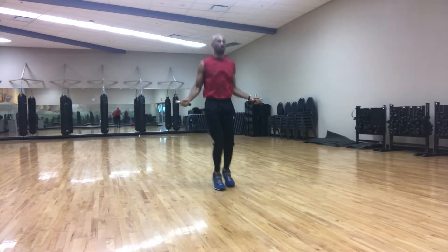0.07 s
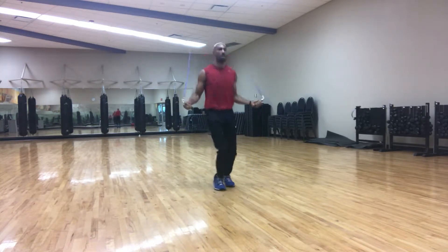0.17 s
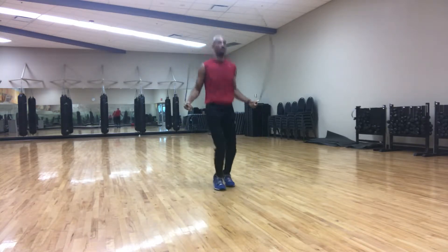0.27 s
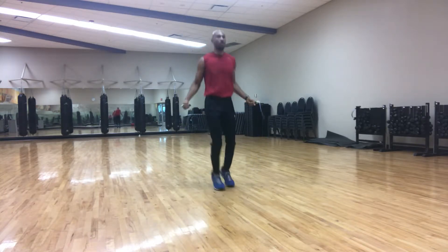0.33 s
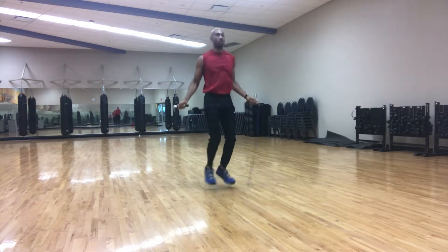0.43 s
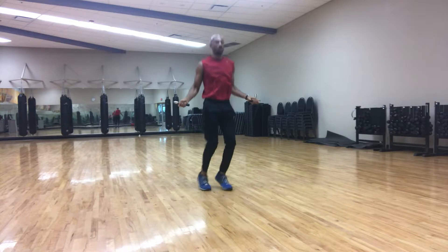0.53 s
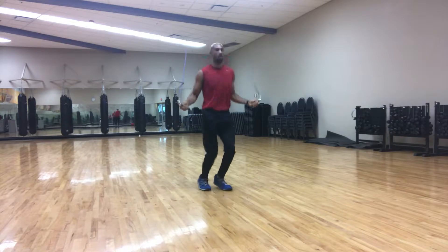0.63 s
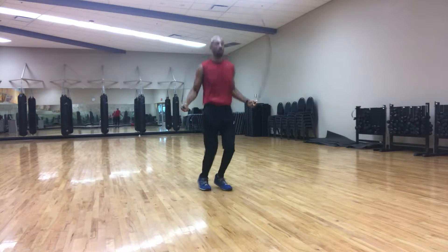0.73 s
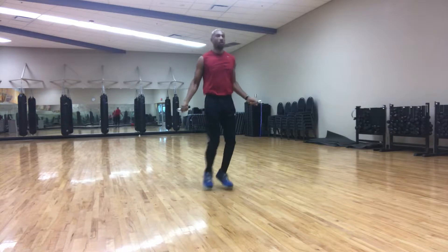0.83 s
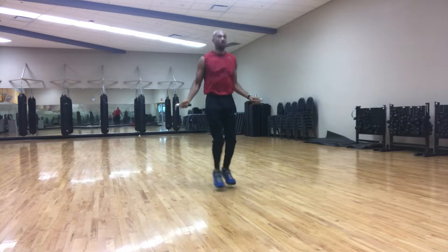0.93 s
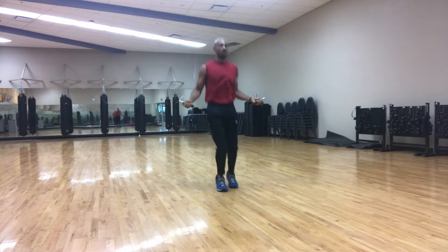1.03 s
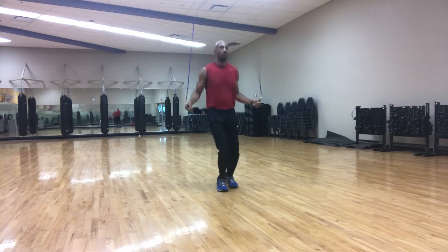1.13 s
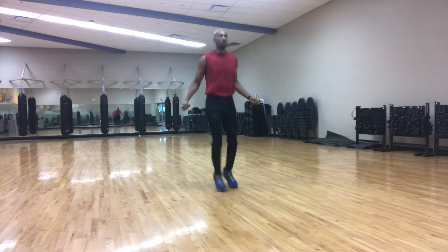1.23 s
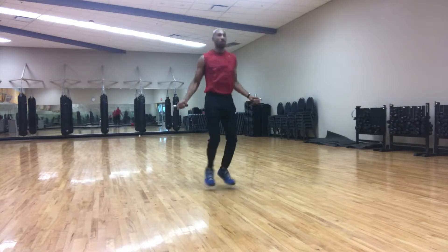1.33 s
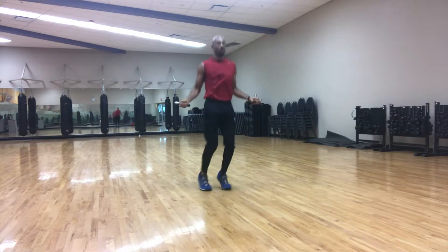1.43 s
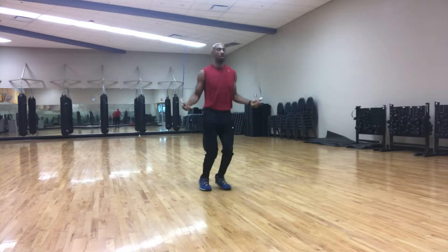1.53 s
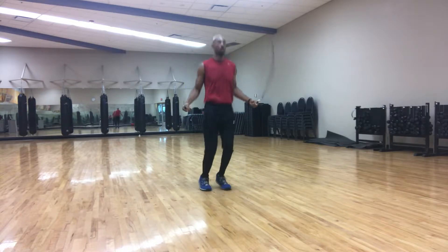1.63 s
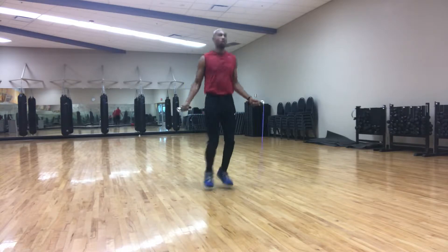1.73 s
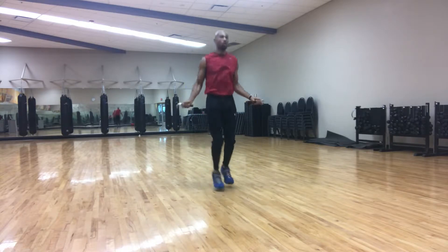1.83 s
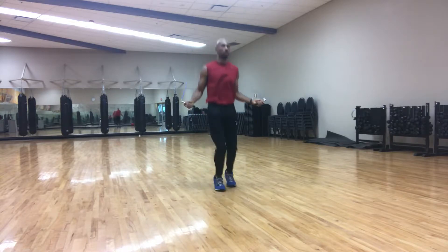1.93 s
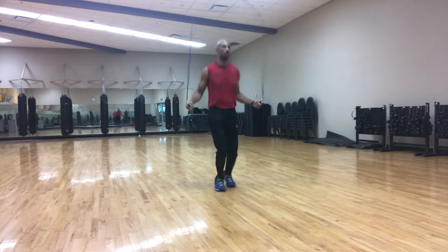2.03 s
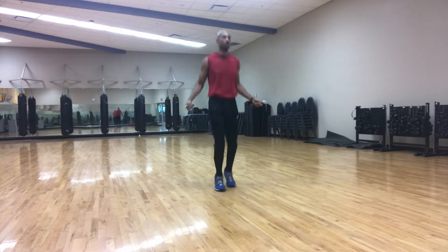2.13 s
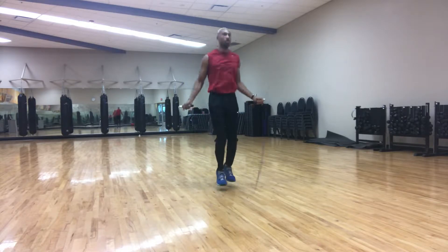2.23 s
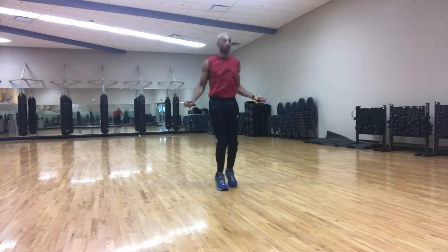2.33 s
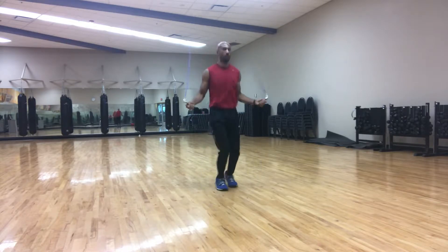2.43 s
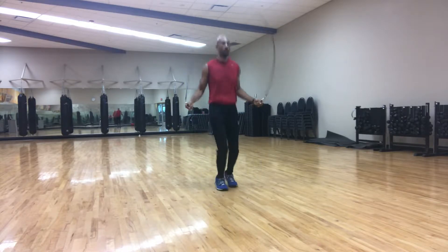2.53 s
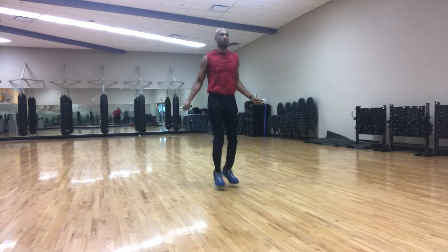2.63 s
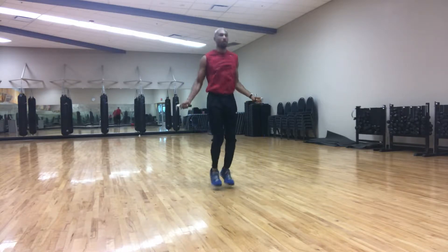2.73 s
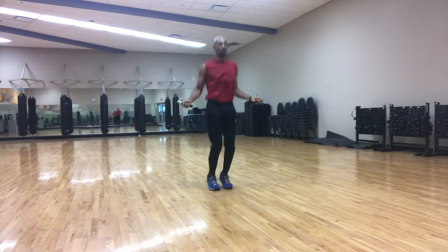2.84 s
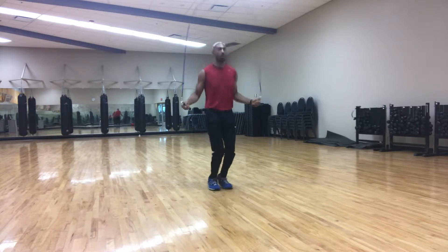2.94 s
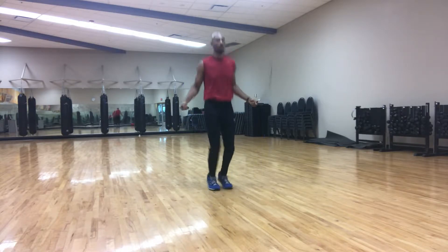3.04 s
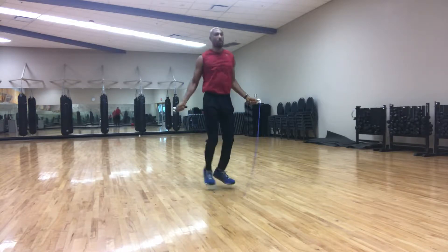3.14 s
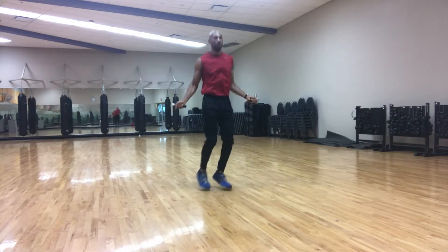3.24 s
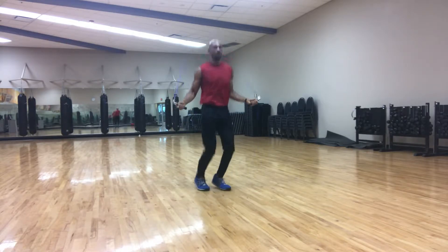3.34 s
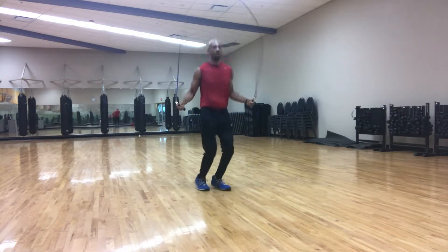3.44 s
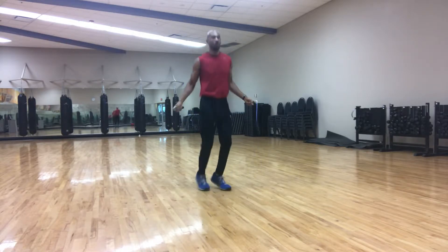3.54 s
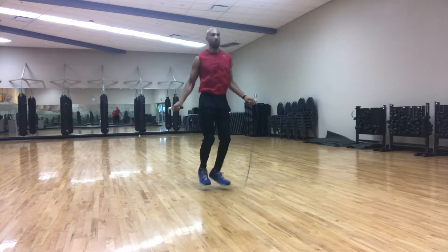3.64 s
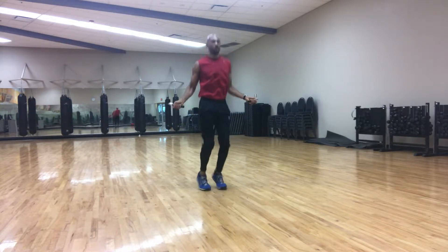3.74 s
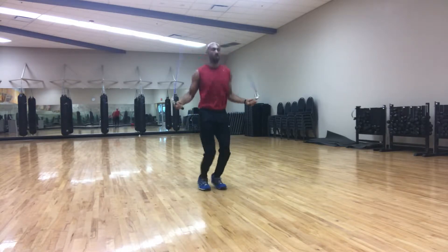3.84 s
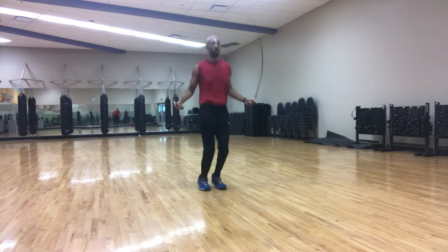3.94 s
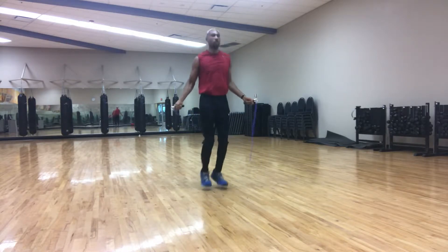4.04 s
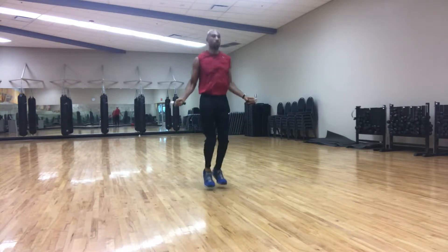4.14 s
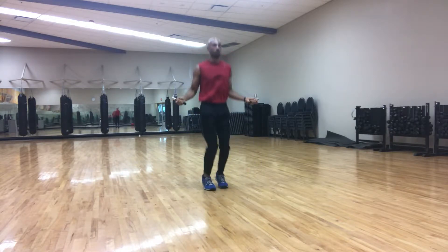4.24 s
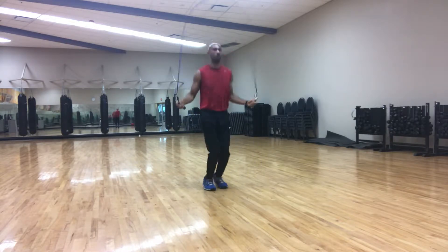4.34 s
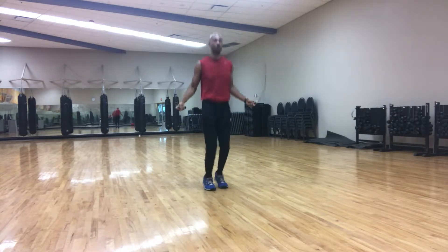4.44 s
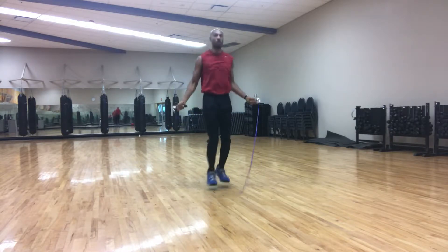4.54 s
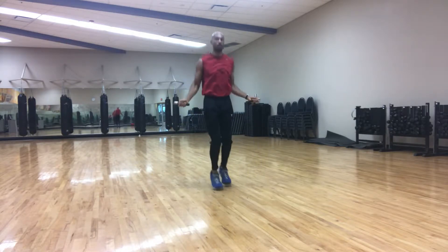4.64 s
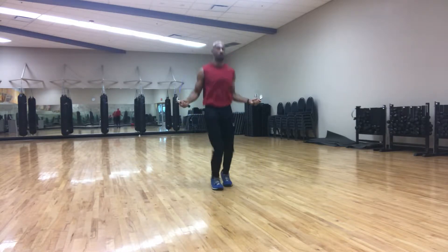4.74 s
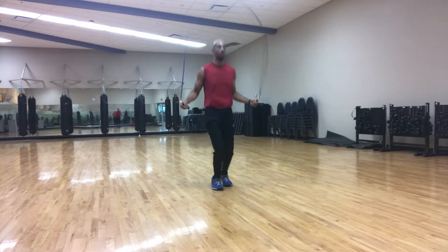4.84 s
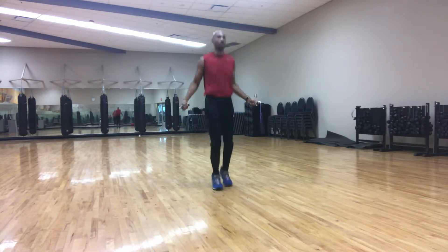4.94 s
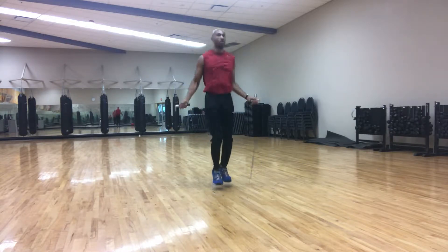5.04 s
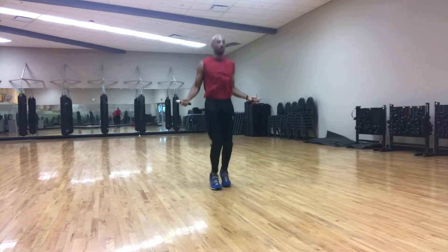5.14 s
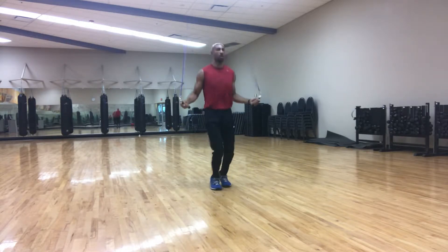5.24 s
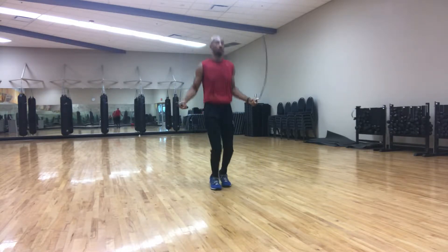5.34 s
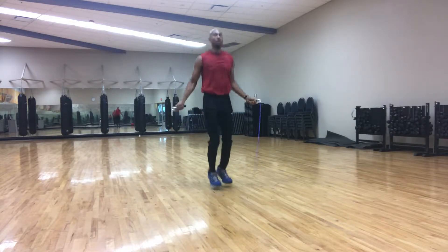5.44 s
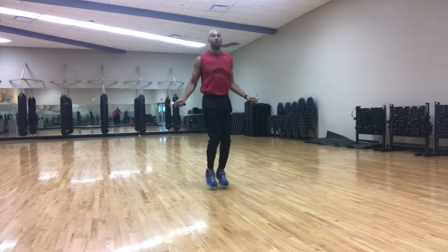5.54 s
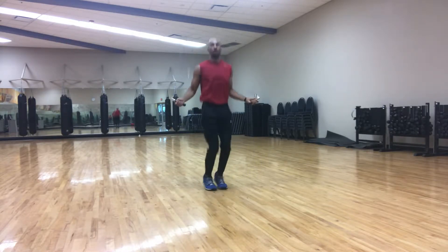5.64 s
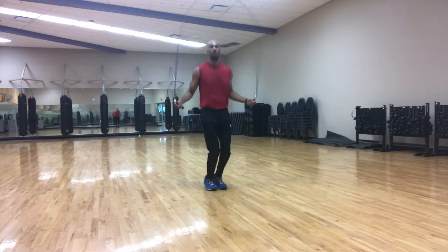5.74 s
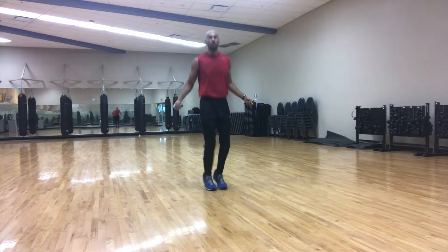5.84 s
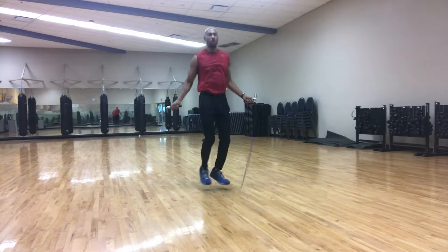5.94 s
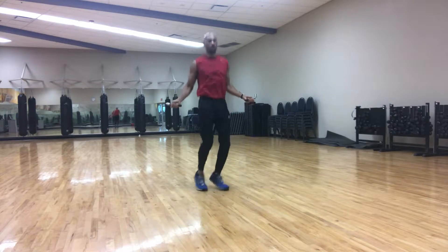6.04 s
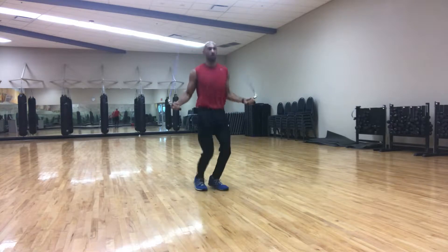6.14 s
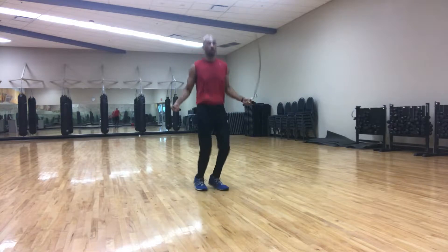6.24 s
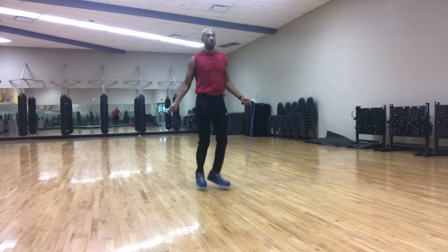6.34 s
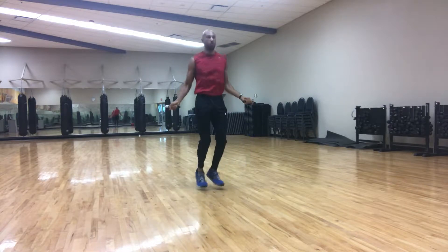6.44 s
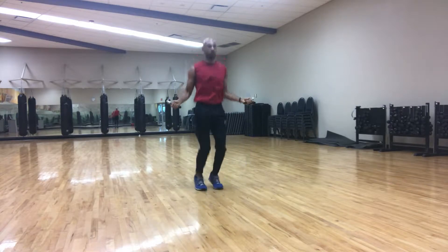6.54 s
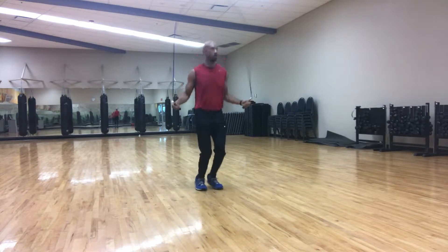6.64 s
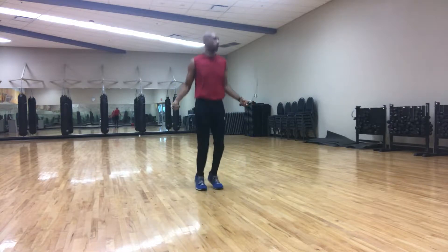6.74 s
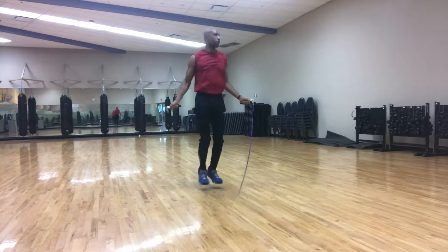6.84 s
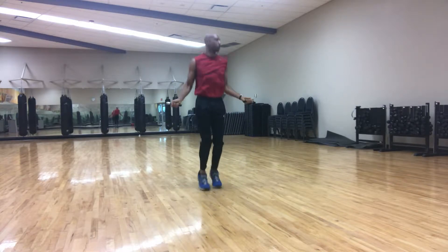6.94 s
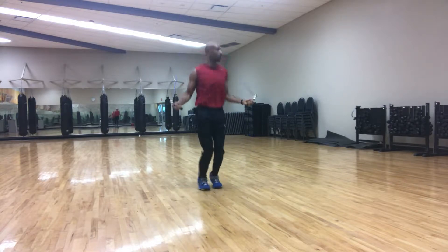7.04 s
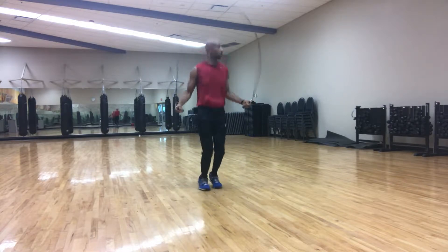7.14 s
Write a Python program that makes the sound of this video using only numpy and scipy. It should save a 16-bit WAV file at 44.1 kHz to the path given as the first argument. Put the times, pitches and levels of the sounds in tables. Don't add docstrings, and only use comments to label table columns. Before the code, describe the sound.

A heavy skipping rope cracks sharply on a wooden floor about twice a second, shoes tapping down between slaps in a big echoing gym.

```python
import sys
import numpy as np
from scipy import signal
from scipy.fft import rfft, irfft
from scipy.io import wavfile
from scipy.ndimage import uniform_filter1d

SR = 44100
rng = np.random.default_rng(int(sys.argv[2]) if len(sys.argv) > 2 else 0)


def gain_from_db(level_db):
    decades = np.asarray(level_db, float) / 20
    return 10 ** decades


def pcm_store(signal):
    levels = np.round(np.clip(np.atleast_2d(signal), -1, 1) * 32767)
    wavfile.write(sys.argv[1], SR, levels.astype(np.int16).T)


N = 316622

# (time [s], crack peak [dB], knock pitch [Hz], knock level [dB], ceiling echo [dB])
SLAPS = [(0.0172, -11, 1330, -27.5, -2), (0.4766, -9, 1413, -17, 1.5), (0.9401, -7.5, 1260, -21, -2),
         (1.4024, -11, 1230, -24, 0), (1.8518, -9.5, 1360, -17, 2), (2.3171, -10.5, 1270, -17.5, 3),
         (2.7751, -10, 1190, -23, 1), (3.2346, -10, 1220, -27.5, -2), (3.7048, -12.5, 1220, -24, 4.5),
         (4.1777, -12, 1510, -25.5, -0.5), (4.6373, -10, 1630, -28.5, -2), (5.0989, -9.5, 990, -23, -0.5),
         (5.5689, -12, 1000, -33, 2), (6.0145, -10.5, 1270, -26.5, 1), (6.4709, -9.5, 1240, -20, 0),
         (6.9299, -10.5, 1230, -21, 0)]


def evened(x):
    return x / np.sqrt(np.mean(x ** 2) + 1e-20)


def read(points, hz):
    f, value = np.transpose(points)
    return np.interp(np.log(hz + 1), np.log(f + 1), value)


def add(mix, s, sound):
    start = round(s * SR)
    part = mix[max(start, 0):][:len(sound) + min(start, 0)]
    part += sound[max(-start, 0):][:len(part)]


def coloured(x, points):
    hz = np.fft.rfftfreq(len(x), 1 / SR)
    return irfft(rfft(x) * gain_from_db(read(points, hz)), len(x))


def burst(t, hz, ms):
    return np.cos(2 * np.pi * hz * t) * np.exp(-.5 * (t * 1000 / ms) ** 2)


def resonate(x, hz, width):
    turn = np.exp(2j * np.pi * np.cumsum(np.broadcast_to(hz, len(x))) / SR)
    r = np.exp(-np.pi * width / SR)
    return 2 * (turn * signal.lfilter([1 - r], [1, -r], x / turn)).real


def hall(x, colour, start_ms, rise_ms):
    # (frequency [Hz], decay by 60 dB [s])
    hall_t60 = [(60, 0.33), (200, 0.79), (600, 0.94), (1500, 0.9), (3500, 1.245), (6500, 0.81),
                (10000, 0.68), (16000, 0.74)]
    size = SR + SR // 2
    slots = np.arange(0, size - 16, 16)
    at = slots + rng.integers(0, 16, len(slots))
    taps = np.zeros(size)
    taps[at] = rng.choice([-1., 1.], len(at))
    hz, t, z = signal.stft(taps, SR, nperseg=512)
    clumps = uniform_filter1d(rng.standard_normal(z.shape), size=9, axis=0)
    clumps = 2.5 * evened(uniform_filter1d(clumps, size=2, axis=1))
    decay = 60 * t / np.maximum(read(hall_t60, hz), .1)[:, None]
    tail = signal.istft(z * gain_from_db(clumps + read(colour, hz)[:, None] - decay), SR, nperseg=512)[1]
    tail *= np.clip((np.arange(len(tail)) / SR * 1000 - start_ms) / rise_ms, 0, 1)
    return signal.fftconvolve(x, tail / np.sqrt(size / 160))[:N]


def ventilation():
    # (frequency [Hz], density [dB per Hz])
    duct_colour = [(20, -56), (40, 2), (60, -3), (90, -8.5), (130, -10.5), (200, -16), (270, -11),
                   (500, -22), (1000, -26), (2500, -35), (2900, -32), (4300, -36.5), (4800, -39),
                   (9000, -50), (16000, -46)]
    return gain_from_db(-48) * evened(coloured(rng.standard_normal(N), duct_colour))


def rope_hum():
    # (share of the turn, pitch [Hz], level [dB])
    sweep = [(0, 412, 7.5), (.08, 421, -11.5), (.22, 383.5, 6.5), (.33, 382.4, -3.7), (.5, 401, 0),
             (.7, 357, -4.5), (.8, 388, 0), (.88, 423.5, -1.5), (1, 432, 2.5)]
    s = np.transpose(SLAPS)[0]
    s = np.concatenate([[2 * s[0] - s[1]], s, [2 * s[-1] - s[-2]]])
    turn = np.interp(np.arange(N) / SR, s, np.arange(len(s))) % 1
    share, hz, db = np.transpose(sweep)
    pitch = np.interp(turn, share, hz)
    tone = rng.standard_normal(N)
    for width in (45, 110, 160):
        tone = resonate(tone, pitch, width)
    return gain_from_db(-48.5 + np.interp(turn, share, db)) * evened(tone)


def handle_chirps():
    # (time [s], peak [dB], pitch [Hz])
    chirps = [
        (2.305, -48, 2320),
        (4.6205, -40, 2390),
        (5.529, -59, 2270),
        (6.4575, -39, 2250),
    ]
    out, t = np.zeros(N), np.arange(400) / SR
    for s, db, hz in chirps:
        add(out, s, gain_from_db(db - 1.0) * burst(t - .003, hz, 1.9))
    return out


def handle_ticks():
    # (delay after the slap [ms], tick peak [dB], low rattle [dB])
    jolts = [(115, -29, -32.5), (127, -29.5, -32), (121, -30.5, -31), (116, -34, -32), (120, -30, -25),
             (114.3, -34.5, -36), (118.7, -33.5, -30), (122, -32.5, -31.5), (115.5, -33.5, -30),
             (117, -34.5, -35), (114, -33, -35), (118.5, -32, -33.5), (111, -35, -34), (117, -31, -31.5),
             (116, -30.5, -29), (117, -31.5, -32)]
    # (pitch [Hz], level [dB])
    swivels = [(2250, -4), (4400, -7)]
    out, t = np.zeros(N), np.arange(6000) / SR
    for (s, *_), (ms, tick_db, rattle_db) in zip(SLAPS, jolts):
        envelope = gain_from_db(-60 * t / 0.0087) + 1.07 * burst(t - .0022, 0, 0.66)
        shake = rng.standard_normal(len(t)) * np.minimum(t / 0.00032, 1) * envelope
        tick = resonate(resonate(shake, 11600, 4000), 11600, 4000)
        rattle = resonate(resonate(shake, 3800, 3500), 3800, 3500)
        clink = np.zeros(len(t))
        for hz, db in swivels:
            louder, sharper = rng.standard_normal(2)
            clink += gain_from_db(db + 1.8 * louder) * burst(t - .0013, hz * (1 + 0.029 * sharper), 1.26)
        add(out, s + ms / 1000, gain_from_db(tick_db + 5) * tick + gain_from_db(rattle_db) * (rattle + clink))
    return out


def footfalls():
    # (time [s], tap peak [dB], tap pitch [Hz], thud level [dB])
    first_shoe = [(0.12, -34.5, 1060, -44), (0.572, -37, 969, -60), (1.042, -29.5, 910, -32.5),
                  (1.498, -31.5, 980, -36), (1.96, -29, 920, -62), (2.422, -26, 1240, -41),
                  (2.881, -30.5, 900, -36), (3.333, -43, 877, -65), (3.807, -29.5, 1120, -29.5),
                  (4.277, -31, 1110, -34), (4.753, -30.5, 960, -33.5), (5.212, -29.5, 810, -35),
                  (5.674, -30.5, 850, -37), (6.115, -42, 840, -51), (6.57, -28.5, 1730, -28),
                  (7.043, -27.5, 940, -38)]
    # (delay after the first [ms], tap peak [dB], thud level [dB])
    second_shoe = [(15.96, -36, -31), (19.5, -27.5, -34.5), (15.16, -32.5, -27.5), (21.6, -35, -39.5),
                   (9.02, -33.5, -27.5), (12.03, -40, -28), (11.07, -40, -35.5), (20.2, -29, -34),
                   (14.04, -36, -35.5), (17.9, -34.5, -35.5), (10.7, -36.5, -26), (13.04, -39.5, -35.5),
                   (10.97, -30, -33), (13.04, -30, -32), (14.9, -27.5, -41), (13.53, -46, -32.5)]
    # (pitch [Hz], level [dB], decay by 60 dB [s])
    boards = [(106, -39, 0.046), (136.7, 0.5, 0.13), (176, 8.5, 0.067), (207, -16, 0.053),
              (353.4, -1.5, 0.13), (596, -3.5, 0.034)]
    out, t = np.zeros(N), np.arange(6000) / SR
    second = [(row[0] + ms / 1000, tap_db, 980, thud_db)
              for row, (ms, tap_db, thud_db) in zip(first_shoe, second_shoe)]
    for s, tap_db, tap_hz, thud_db in sorted(first_shoe + second):
        tap = -gain_from_db(tap_db + 3.0) * burst(t - .0012, tap_hz, 0.55)
        scuff = gain_from_db(tap_db) * rng.standard_normal(len(t)) * gain_from_db(-60 * t / 0.054) * np.minimum(t / 0.001, 1)
        scuff = resonate(resonate(scuff, 900, 2070), 900, 2530)
        thud = np.zeros(len(t))
        for hz, db, t60 in boards:
            louder, sharper = rng.standard_normal(2)
            ring = np.sin(2 * np.pi * hz * (1 + 0.025 * sharper) * t)
            thud += gain_from_db(db + 1.75 * louder - 60 * t / t60) * ring
        add(out, s, tap + scuff + gain_from_db(thud_db - 6.0) * thud * np.minimum(t / 0.0045, 1))
    return out


def landings():
    # (frequency [Hz], level [dB])
    step_hall = [(60, -25), (150, 6.5), (400, 4.5), (1000, -4), (3500, 5.5), (8000, 11), (16000, 18)]
    steps = footfalls()
    near = steps + handle_ticks()
    ceiling = np.concatenate([np.zeros(round(.0146 * SR)), near])[:N]
    return near + gain_from_db(-11.5) * ceiling + gain_from_db(2.0) * hall(steps, step_hall, 1.8, 13.0)


def board_bend(t):
    since = np.maximum(t, 0)
    hz = 1200 * (0.004866 / (since + 0.004824)) ** 2 + 60
    chirp = np.sin(2 * np.pi * np.cumsum(hz * (t > 0)) / SR - 1.2)
    return gain_from_db(-30) * chirp * np.minimum(since / 0.0042, 1) * gain_from_db(-60 * (since / 0.044) ** 2)


def wall_echoes(hz, size, ceiling_db):
    # (level [dB], centre [Hz], width [Hz])
    reflections = [(-11.5, 2200, 5000), (-11, 13000, 9000), (1.5, 6200, 1680), (0, 18800, 8800),
                   (-5, 4700, 670), (0, 17400, 15000), (-7, 4300, 3200), (-23.5, 2800, 3400),
                   (-7.5, 4500, 2100), (0, 3380, 920), (-5.5, 4800, 1200), (-17, 5100, 9100),
                   (-15, 15000, 5400), (-11, 2900, 2200), (-12, 6000, 4800), (-14, 3900, 5600),
                   (-17.5, 1300, 7600), (-11.5, 4700, 500), (-12, 5500, 470), (-8, 3600, 1200),
                   (-19, 10000, 6000), (-15, 5300, 1600)]
    reflection_ms = [3.2, 5.4, 14.0, 14.0, 16.4, 19.0, 21.1, 23.4, 28.2, 31.6, 34.8, 36.4, 38.0, 41.2, 43.1,
                     55.3, 68.4, 79.0, 81.8, 83.2, 84.5, 90.6]
    db, centre_hz, width_hz = np.transpose(reflections)[:, :, None]
    ms = np.array(reflection_ms)[:, None]
    shift = rng.standard_normal((len(ms), 2))
    delay = np.exp(-2j * np.pi * hz * (ms + 0.066 * shift[:, :1]) / 1000)
    off = abs(ms - 15)
    spread = np.clip(off, 1, 14) ** 2 / (off + 4) / 9000 + np.maximum(ms - 22, 0) / 30000
    scatter = rng.standard_normal((len(ms), 400)) * np.exp(-np.arange(400) / SR / spread)
    scatter[:, 0] = abs(scatter[:, 0]) + .5
    scatter = rfft(scatter / np.linalg.norm(scatter, axis=1)[:, None], size)
    gain = gain_from_db(db + 1.4 + shift[:, 1:] + ceiling_db * (ms == 14))
    band = (1 + 1.3j * (hz - centre_hz) / width_hz) ** 2
    return (delay * scatter * gain / band).sum(0)


def slap(crack_db, knock_hz, knock_db, ceiling_db):
    # (frequency [Hz], level [dB])
    crack_colour = [(300, 2), (2000, 2), (3500, 0), (4800, -4.5), (6500, -0.5), (9000, -6), (12000, 3),
                    (15500, 5)]
    bass_ms = [14.3, 19.3, 21.7, 33.0]
    bass_db = [-7.5, -8, -42, -29]
    t = (np.arange(8192) - 512) / SR
    hz = np.fft.rfftfreq(len(t), 1 / SR)
    grit = rng.standard_normal(len(t))
    lay = gain_from_db(-29.5) * grit * np.clip((t + 0.0075) / 0.0018, 0, 1) * (t < 0) * gain_from_db(1400 * t)
    lay = coloured(lay, [(1500, -6.5), (4000, 6.5), (8000, -3), (11000, -2), (16000, -46)])
    rattle = gain_from_db(-23) * uniform_filter1d(grit, size=2) * (t > 0) * gain_from_db(-60 * np.abs(t) / 0.031)
    snap = (t == 0) - .7 * (np.arange(len(t)) == 515)
    tilt = gain_from_db(-2 * np.log2(hz / 6000 + 0.029))

    def voiced(x):
        return gain_from_db(crack_db + 8.5) * irfft(rfft(coloured(x, crack_colour)) * tilt, len(t))

    crack, plain = voiced(snap + lay + rattle), voiced(snap)
    knock = gain_from_db(knock_db) * burst(t + .0001, knock_hz, np.where(t < 0, .7, 1.1))
    knock += gain_from_db(knock_db - 8) * burst(t - .0006, 0.66 * knock_hz, 0.99)
    bend = board_bend(t)
    walls = wall_echoes(hz, len(t), ceiling_db)
    bass = sum(gain_from_db(db) * np.exp(-2j * np.pi * hz * ms / 1000) for ms, db in zip(bass_ms, bass_db))
    low = bend + gain_from_db(-7.5) * knock
    echoes = irfft(rfft(crack) * walls + rfft(low) * bass, len(t))
    return plain + gain_from_db(-15) * knock + bend, crack + knock + bend + echoes


def rope_slaps():
    # (frequency [Hz], level [dB])
    slap_hall = [(60, -46), (150, -6.5), (400, 1), (1000, 0.5), (2200, 0.5), (2900, 2.5), (4300, 5.5),
                 (4800, 0), (6300, 2), (10300, -2.5), (12000, 1), (16000, 6)]
    bare, near = np.zeros(N), np.zeros(N)
    for s, *row in SLAPS:
        bare_slap, near_slap = slap(*row)
        start = s + .0015 - 512 / SR
        add(bare, start, bare_slap)
        add(near, start, near_slap)
    return near + gain_from_db(1.5) * hall(bare, slap_hall, 4.3, 35.0)


def scene():
    return (ventilation() + rope_hum() + handle_chirps() + landings() + rope_slaps())[None]


def low_pass(x):
    return signal.sosfilt(signal.butter(12, 16810, fs=SR, output="sos"), x)


def record(dry):
    # (frequency [Hz], level [dB])
    microphone = [(20, -18.5), (70, 0), (120, -0.5), (9500, 1), (10300, -7), (11200, -6.5), (14500, -9.5),
                  (15600, -13), (16100, -29), (17000, -62)]
    mix = coloured(dry[0], microphone)[None]
    return low_pass(mix)


dry = scene()
out = record(dry)
pcm_store(out)
```